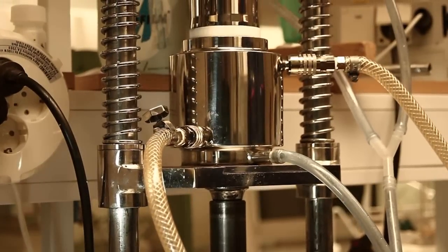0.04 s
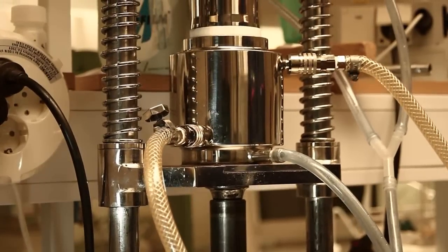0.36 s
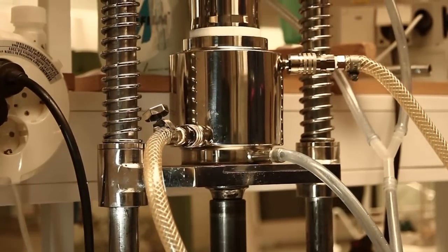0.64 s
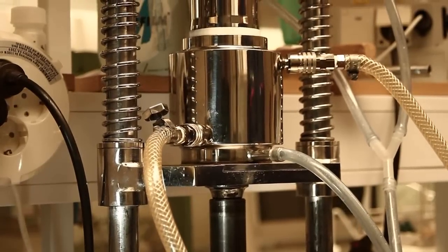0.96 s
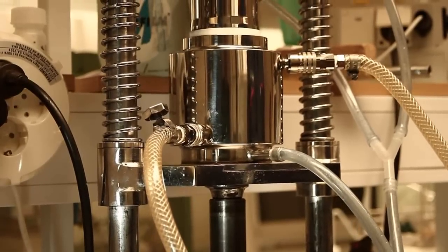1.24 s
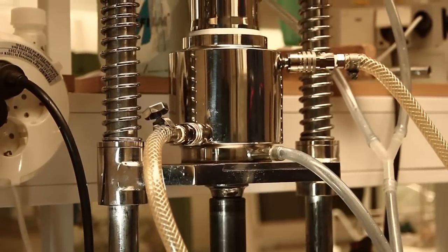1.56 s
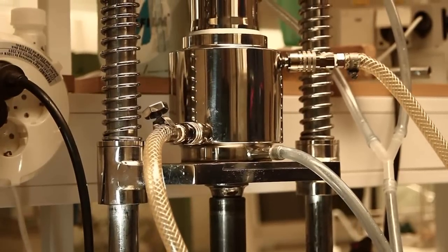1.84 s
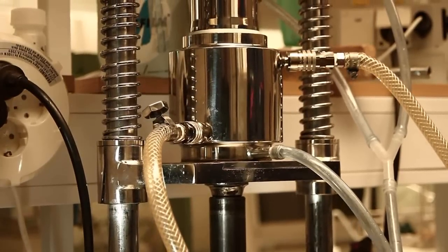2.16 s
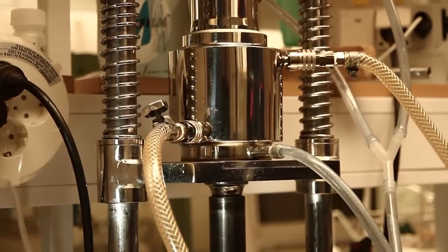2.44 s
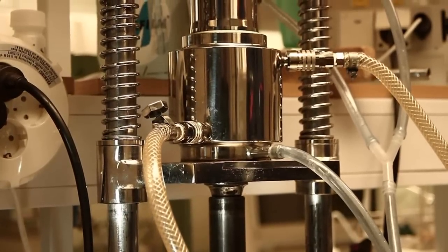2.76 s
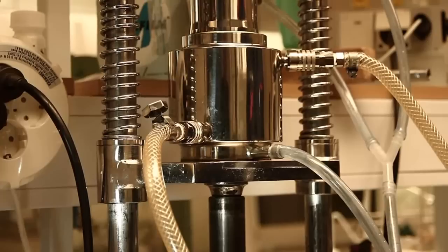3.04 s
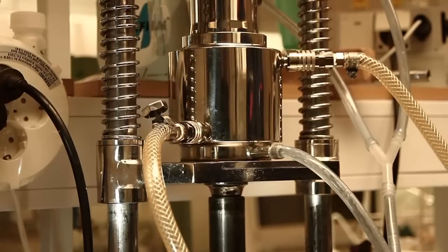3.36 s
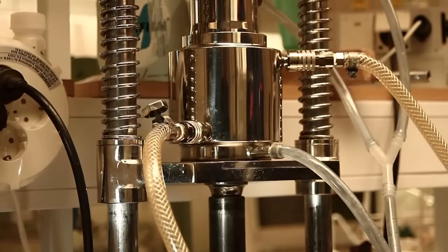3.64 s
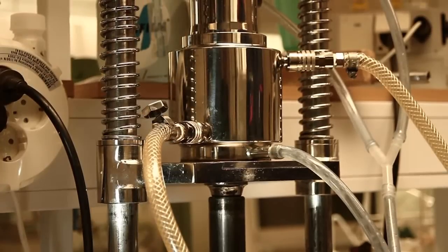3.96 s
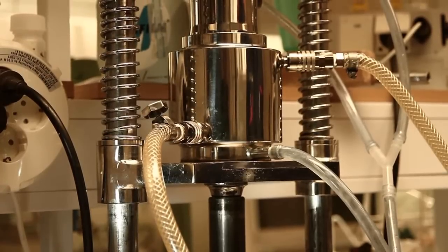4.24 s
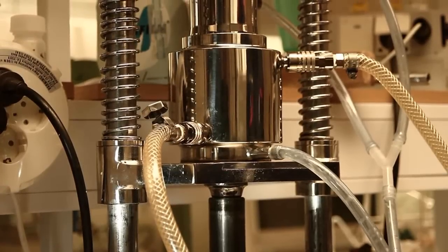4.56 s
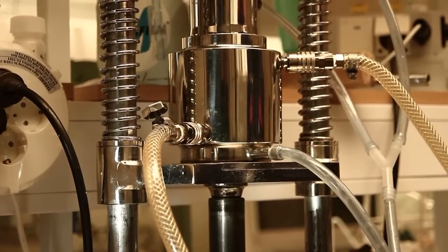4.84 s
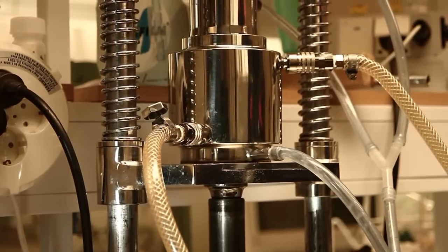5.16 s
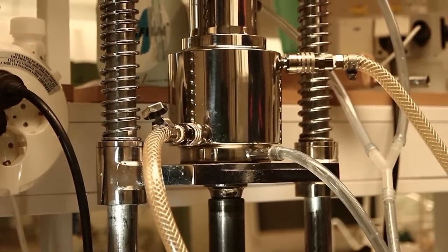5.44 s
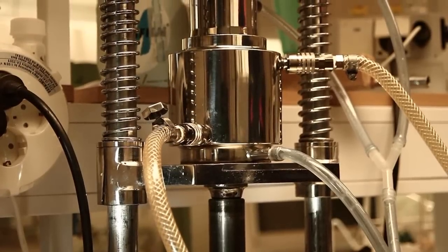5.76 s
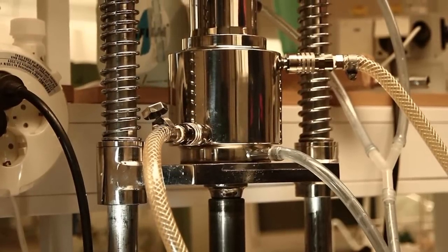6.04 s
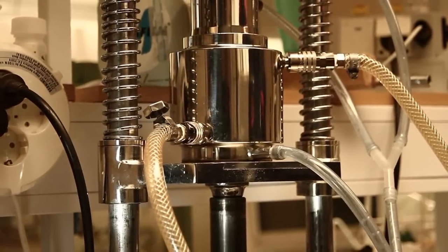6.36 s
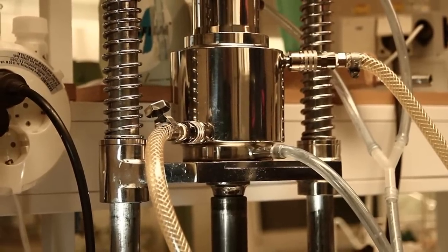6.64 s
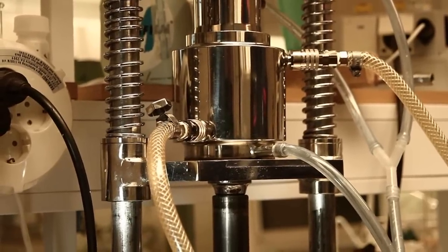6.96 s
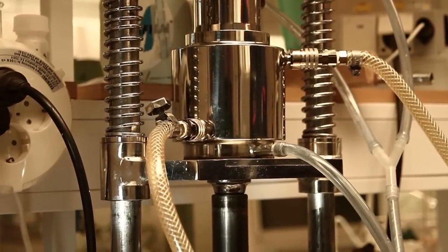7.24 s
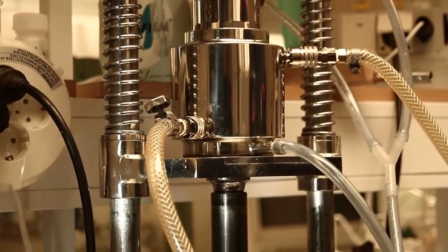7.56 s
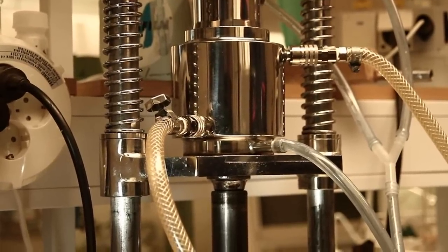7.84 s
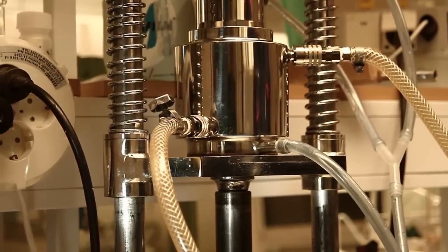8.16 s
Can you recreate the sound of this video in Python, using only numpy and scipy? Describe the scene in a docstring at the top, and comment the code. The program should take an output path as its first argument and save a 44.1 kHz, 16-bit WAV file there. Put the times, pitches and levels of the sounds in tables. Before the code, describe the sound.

An air-driven pump works a press in a small laboratory, heard close up. Each stroke is a short, sharp blast of air with a valve thump and a hollow piston shudder. The strokes start at about two a second and slow until over a second apart. A steady high hiss from the fittings dips at each blast and swells back, above a faint motor hum.

```python
"""A small laboratory, a pulp press under vacuum. An air-driven pump strokes ever more slowly as pressure
builds: a valve thumps, a port vents a short blast, the piston shudders back. Air hisses steadily through
the fittings and a motor hums. The microphone's gain control ducks at each blast, so the hiss swells
back between strokes."""
import sys
import numpy as np
from scipy import signal
from scipy.fft import rfft, irfft, next_fast_len
from scipy.io import wavfile
from scipy.ndimage import uniform_filter1d, map_coordinates

SR = 44100
rng = np.random.default_rng(int(sys.argv[2]) if len(sys.argv) > 2 else 0)


def unload_wav(signal):
    """Save mono or channel-first audio to the path in sys.argv[1] as 16-bit WAV at rate SR, clipped to [-1, 1]."""
    wavfile.write(
        sys.argv[1],
        SR,
        np.round(np.clip(np.atleast_2d(signal).T, -1, 1) * 32767).astype(np.int16),
    )


N = 361619

# pump strokes: t/s, relative blast level/dB
PUMP_STROKES = [(-.033, -2.5), (0.4853, -6), (0.9996, -5), (1.5239, -4), (2.0547, -4), (2.598, -6),
                (3.1612, -5.5), (3.7623, -5), (4.4363, -3), (5.2345, -4.5), (6.2327, -2), (7.5882, -2)]
# press load: t/s, share of full pressure
PRESSURE_CURVE = [(0, 0.18), (2.4, 0), (3.7, 0.43), (6, 0.86), (7.2, 1), (8.2, 0.73)]
# air surging past liquid in the line: t/s, level/dB, hold/s
LINE_SURGES = [(0.875, -20, 0.041), (1.913, -32, 0.12), (4.266, -23, 0.18), (6.409, -13.5, 0.055),
               (7.793, -13.5, 0.052)]
# noise spectra: f/Hz, relative level/dB
PORT_SPECTRUM = [(100, -49), (400, -23), (900, -19), (1500, -14), (2600, -11), (4400, -5), (7000, -6),
                 (10000, -7.5), (12200, 1), (14000, -2.5)]
VALVE_SPECTRUM = [(30, -22), (100, -0.5), (180, -6), (300, 8), (410, -6), (660, -9), (770, 2), (950, -23),
                  (1230, 4), (1500, -25), (3000, -7.5), (6000, -38)]
PISTON_SPECTRUM = [(40, -34), (130, -20), (190, -5), (280, -7), (360, -12), (600, -8.5), (950, -13),
                   (2500, -8), (6000, -15.5)]
LEAK_SPECTRUM = [(100, -49), (400, -27), (900, -20), (1500, -12.5), (2600, -7), (4400, -1.5), (7000, -6),
                 (10000, -10), (12500, -7), (14000, -11)]
SURGE_SPECTRUM = [(1500, -30), (3000, -3.5), (4500, -3), (6000, -2), (8000, -12), (14000, -30)]
ROOM_SPECTRUM = [(20, -20), (42, -15), (60, 4.5), (85, -7.5), (135, 0), (180, -2.5), (320, -3.5), (550, -3),
                 (900, -9.5), (2000, -21), (8000, -38)]
# resonances: f/Hz, width/Hz, lift/dB
PORT_MODES = [(1103, 37, 8), (1256, 210, 4.6), (1770, 350, 7), (2035, 85, 10), (2340, 70, 9),
              (2480, 150, 8), (2690, 120, 9), (2824, 45, 7), (3034, 400, 7), (3710, 62, 6), (4212, 41, 7),
              (4410, 60, 5), (6850, 200, 6), (7280, 65, 7), (7455, 41, 5.5), (8220, 300, 5), (8640, 49, 5),
              (8840, 38, 5), (9543, 35, 5), (11300, 120, 5), (11984, 60, 6), (14314, 50, 4)]
CYLINDER_MODES = [(178, 20, 5), (205, 20, 5), (285, 50, 6), (550, 40, 5), (750, 40, 5), (1100, 40, 5)]
FITTING_MODES = [(1110, 20, 4), (1732, 20, 5), (2022, 40, 7), (2445, 300, 3), (2688, 130, 3), (2828, 20, 8),
                 (2950, 40, 4), (3050, 36, 6), (3235, 130, 3.5), (3527, 22, 4), (3740, 41, 5.5),
                 (3841, 16, 4.5), (4290, 25, 3.5), (4395, 36, 5), (4526, 36, 6), (4630, 36, 4.5),
                 (5275, 50, 3), (6459, 36, 6), (7281, 30, 5), (7468, 40, 4.5), (8100, 80, 5.5),
                 (8330, 70, 4.5), (8645, 40, 6.5), (9206, 24, 6), (9368, 28, 6.5), (9540, 32, 6.5),
                 (9980, 40, 6.5), (11290, 200, 4.5), (11977, 38, 5), (14314, 36, 5.5)]
# motor partials: f/Hz, level/dB
MOTOR_PARTIALS = [(61, -55), (123, -51.5), (204, -48), (274.3, -41.5), (436, -48)]
# room decay: f/Hz, t60/s
ROOM_DECAY = [(200, 0.17), (2500, 0.78), (6000, 0.52), (13000, 0.11)]
# microphone treble roll-off: f/Hz, level/dB
MIC_RESPONSE = [(14200, 0), (14700, -2.5), (15700, -4)]


def port_blasts(level_db=1, load_loss_db=4, dump_db=-5.5, reverb_db=-5):
    """The port snaps open, dumps stored air, vents while the piston travels, and shuts."""
    flow = np.zeros(N)
    for at_s, stroke_db in PUMP_STROKES:
        vent = burst(at_s - .008, rise_s=.018, hold_s=port_open_s(at_s), t60_s=.24)
        vent *= amp(-load_loss_db * pressure(at_s))
        dump = amp(dump_db) * burst(at_s - .007, rise_s=.012, hold_s=.015, t60_s=.19)
        flow += amp(level_db + stroke_db) * (vent + dump)
    jet = early_echoes(noise(PORT_SPECTRUM, PORT_MODES), echo_db=-7)
    air = flow * amp(.72 * wobble(120)) * jet
    return air + amp(reverb_db) * reverb(air)


def valve_thumps(level_db=-24, load_gain_db=9.5, lead_s=.0083):
    """The valve shifts just ahead of each blast, harder against pressure."""
    thumps = np.zeros(N)
    for at_s, _ in PUMP_STROKES:
        gain = amp(level_db + load_gain_db * pressure(at_s))
        thumps += gain * burst(at_s - lead_s, rise_s=.005, hold_s=.0071, t60_s=.043)
    return thumps * noise(VALVE_SPECTRUM)


def cylinder_note(level_db=-29, start_hz=275, end_hz=174, glide_s=.034):
    """Two swells per stroke; the note sinks as the chamber grows."""
    note = np.zeros(N)
    for at_s, _ in PUMP_STROKES:
        for delay_s, swell_db in (0, 0), (.095, -3.5):
            start_s = landing_s(at_s) + delay_s
            age_s = np.maximum(time_s() - start_s, 0)
            pitch_hz = end_hz + (start_hz - end_hz) * np.exp(-age_s / glide_s)
            phase = 2 * np.pi * (np.cumsum(pitch_hz) / SR + rng.random())
            note += amp(swell_db) * burst(start_s, rise_s=.028, hold_s=.055, t60_s=.38) * np.sin(phase)
    return amp(level_db + 2.2 * wobble(55)) * note


def piston_bumps(landing_db=-14.5, rebound_db=-26, loss_db=1.5, step_s=.0464, rebounds=3):
    """The piston lands, then rebounds at even steps, each weaker, in the hollow cylinder."""
    bumps = np.zeros(N)
    for at_s, _ in PUMP_STROKES:
        land_s = landing_s(at_s)
        bumps += amp(landing_db) * burst(land_s, rise_s=.008, hold_s=.014, t60_s=.45)
        for k in range(1, rebounds + 1):
            rebound = burst(land_s + k * step_s, rise_s=.006, hold_s=.01, t60_s=.3)
            bumps += amp(rebound_db - loss_db * k) * rebound
    return bumps * noise(PISTON_SPECTRUM, CYLINDER_MODES)


def leak_hiss(level_db=-15, load_gain_db=3, load_treble_db=1, sag_db=5.5, split_hz=7000):
    """Steady jet in the fittings; liquid in the line makes it flutter and surge."""
    jet = early_echoes(noise(LEAK_SPECTRUM, FITTING_MODES), echo_db=-6)
    treble = filtered(jet, lambda hz: hz ** 4 / (hz ** 4 + split_hz ** 4))
    load = pressure(time_s())
    # each stroke draws the line down and dulls the jet
    drawdown = sum(burst(at_s, rise_s=.086, hold_s=.15, t60_s=1) for at_s, _ in PUMP_STROKES)
    flutter_db = .83 * wobble(15) + .5 * wobble(150)
    treble_db = load_treble_db * load - sag_db * drawdown
    steady = amp(flutter_db) * (jet - treble) + amp(treble_db) * treble
    surges = sum(amp(db) * burst(at_s, rise_s=.023, hold_s=hold_s, t60_s=.12)
                 for at_s, db, hold_s in LINE_SURGES)
    return amp(level_db + load_gain_db * load) * steady + surges * noise(SURGE_SPECTRUM, FITTING_MODES)


def motor_hum():
    """Motor partials, each unsteady in level and phase."""
    hum = np.zeros(N)
    for hz, db in MOTOR_PARTIALS:
        peak = np.sqrt(2) * amp(db + 2.2 * wobble(18))
        hum += peak * np.sin(2 * np.pi * hz * time_s() + .85 * wobble(16))
    return hum


def cylinder_shudder(at_s=6.26, level_db=-29.5):
    """One longer, low shudder of the cylinder."""
    rumble = noise([(120, -40), (170, -2), (200, 3), (240, -18), (500, -50)])
    return amp(level_db) * burst(at_s, rise_s=.017, hold_s=.21, t60_s=.15) * rumble


def soft_bump(at_s=7.435, level_db=-23.5):
    """One dull bump in the room."""
    thud = noise([(150, -17), (380, -2), (650, -9), (1500, -16), (5000, -50)])
    return amp(level_db) * burst(at_s, rise_s=.008, hold_s=.022, t60_s=.08) * thud


def room_air(level_db=-33.5):
    """Steady low room noise."""
    return amp(level_db) * noise(ROOM_SPECTRUM)


def pressure(at_s):
    """Share of full pressure."""
    return np.interp(at_s, *np.transpose(PRESSURE_CURVE))


def port_open_s(stroke_s):
    """Vent time: the piston travels more slowly against pressure."""
    return .0789 + .0089 * pressure(stroke_s)


def landing_s(stroke_s):
    """The piston lands as the port shuts."""
    return stroke_s + port_open_s(stroke_s) - .002


def amp(db):
    """Decibels to gain."""
    return 10 ** (np.asarray(db) / 20)


def unit_rms(x):
    """x at rms 1."""
    return x / np.sqrt(np.mean(x ** 2) + 1e-20)


def time_s():
    """Sample times."""
    return np.arange(N) / SR


def log_interp(points, hz):
    """Curve through (f/Hz, value) points on a log axis."""
    knots_hz, values = np.transpose(points)
    return np.interp(np.log(hz + 1), np.log(knots_hz + 1), values)


def wobble(rate_hz):
    """Smooth random curve."""
    knots = rng.standard_normal(int(N * rate_hz / SR) + 4)
    return map_coordinates(knots, [time_s() * rate_hz])


def filtered(x, response):
    """x through a zero-phase gain response(hz)."""
    size = next_fast_len(N + SR // 2)
    return irfft(rfft(x, size) * response(np.fft.rfftfreq(size, 1 / SR)), size)[:N]


def noise(spectrum, modes=()):
    """Noise at rms 1: a smooth (f/Hz, level/dB) spectrum, lifted at resonances."""
    def response(hz):
        lift_db = sum(db / (1 + (2 * (hz - mode_hz) / width_hz) ** 2) for mode_hz, width_hz, db in modes)
        return amp(log_interp(spectrum, hz) + lift_db)
    return unit_rms(filtered(rng.standard_normal(N), response))


def burst(start_s, rise_s, hold_s, t60_s):
    """Envelope: smooth rise, decay from hold_s after the start."""
    age_s = time_s() - start_s
    onset = np.sin(np.pi / 2 * np.clip(age_s / rise_s, 0, 1)) ** 2
    return onset * amp(-60 * np.maximum(age_s - hold_s, 0) / t60_s)


def early_echoes(x, echo_db, spread_s=.045, count=40):
    """Reflections off steel and bench tops comb the sound; output at rms 1."""
    lags = rng.uniform(.05, 1, count)
    gains = rng.standard_normal(count) * np.exp(-lags)
    impulse = np.bincount((lags * spread_s * SR).astype(int), amp(echo_db) * gains / np.linalg.norm(gains))
    impulse[0] += 1
    return unit_rms(signal.fftconvolve(x, impulse)[:N])


def reverb(x):
    """Room tail: each frequency decays at its own rate."""
    hz, age_s, bands = signal.stft(rng.standard_normal(SR), SR, nperseg=256)
    decay = amp(-60 * age_s / log_interp(ROOM_DECAY, hz)[:, None])
    tail = signal.istft(bands * decay, SR, nperseg=256)[1]
    return signal.fftconvolve(x, tail / np.linalg.norm(tail))[:N]


def gain_control(x, threshold_db=-16, slope=.75, attack_s=.007, release_s=.39):
    """Level over the threshold cuts the gain fast; it creeps back."""
    level_db = 10 * np.log10(np.abs(uniform_filter1d(x ** 2, size=160)) + 1e-12)
    target_db = slope * np.maximum(level_db - threshold_db, 0)
    # peak hold with exponential release
    fade = np.exp(-time_s() / release_s)
    held_db = np.maximum.accumulate(target_db / fade) * fade
    pole = np.exp(-1 / (attack_s * SR))
    cut_db = signal.lfilter([1 - pole], [1, -pole], held_db - held_db[0]) + held_db[0]
    return x * amp(-cut_db)


def scene():
    """All sources at one microphone, both channels alike."""
    sound = leak_hiss() + port_blasts() + valve_thumps() + cylinder_note() + piston_bumps()
    sound += motor_hum() + cylinder_shudder() + soft_bump() + room_air()
    return np.array([sound, sound])


def record(dry):
    """Gain control, treble roll-off, band limit."""
    limit_hz = 15740
    ducked = gain_control(dry[0])
    sound = filtered(ducked, lambda hz: amp(log_interp(MIC_RESPONSE, hz)) * (hz < limit_hz))
    return np.array([sound, sound])


dry = scene()
out = record(dry)
unload_wav(out)
```